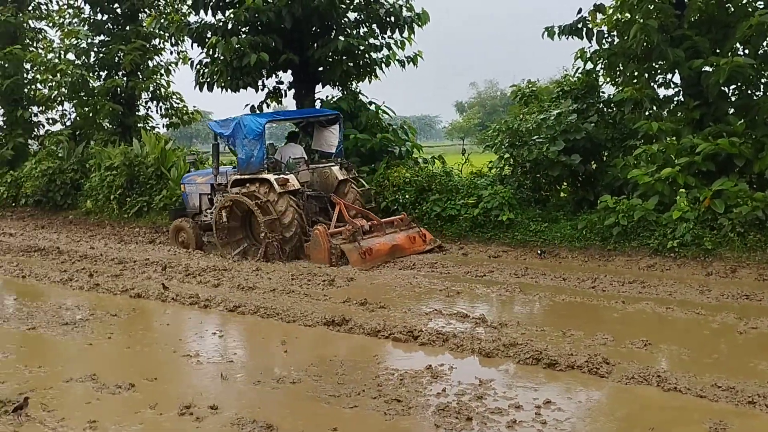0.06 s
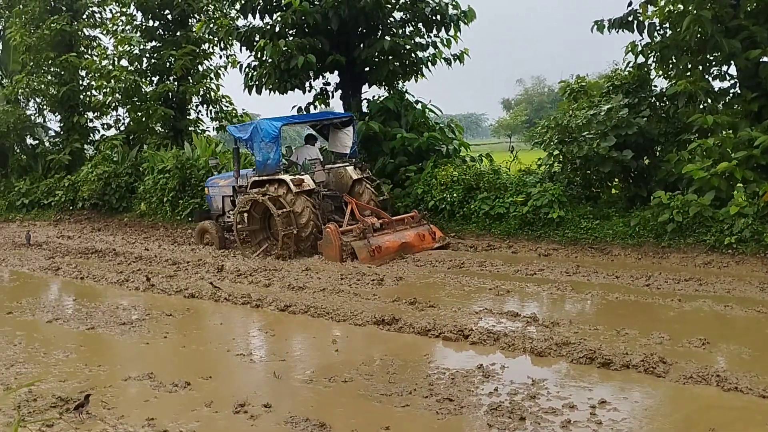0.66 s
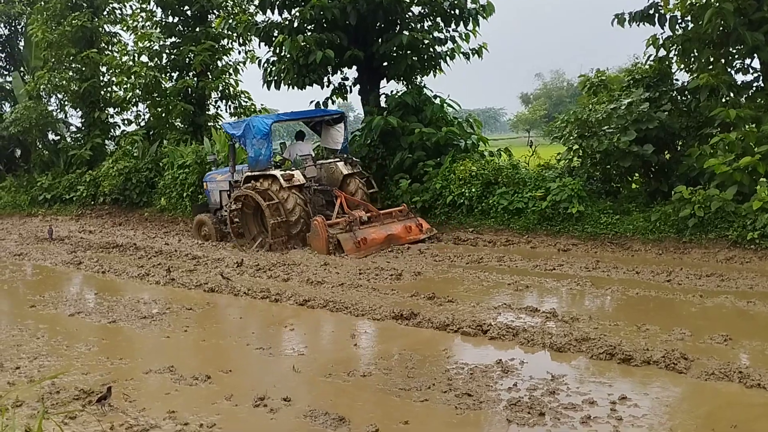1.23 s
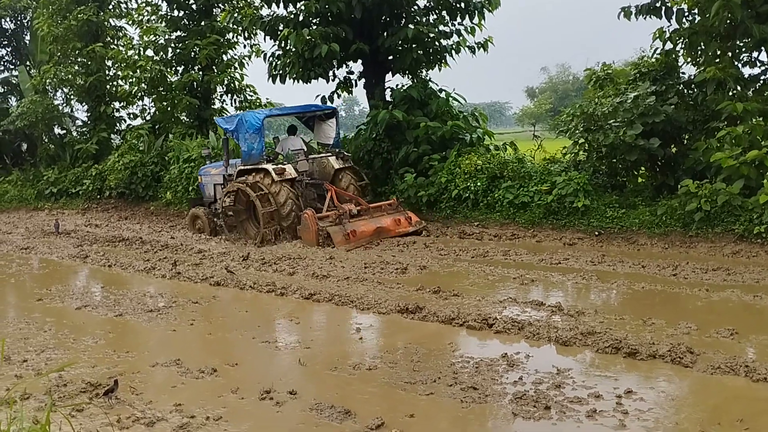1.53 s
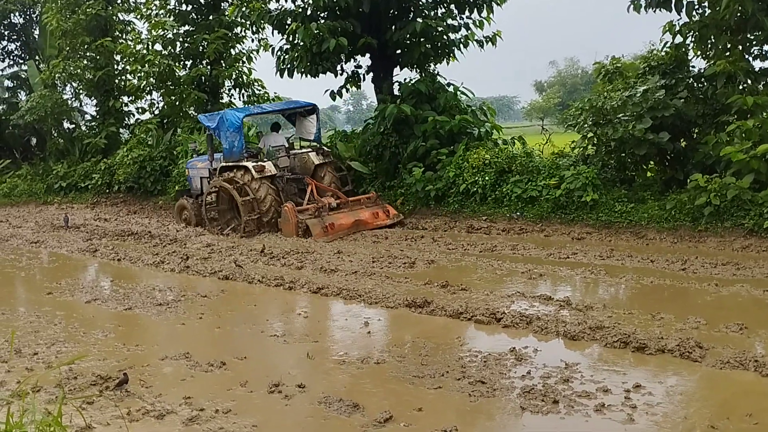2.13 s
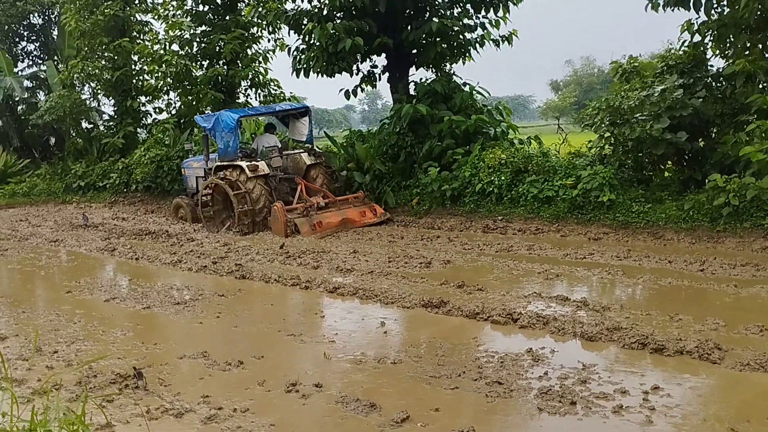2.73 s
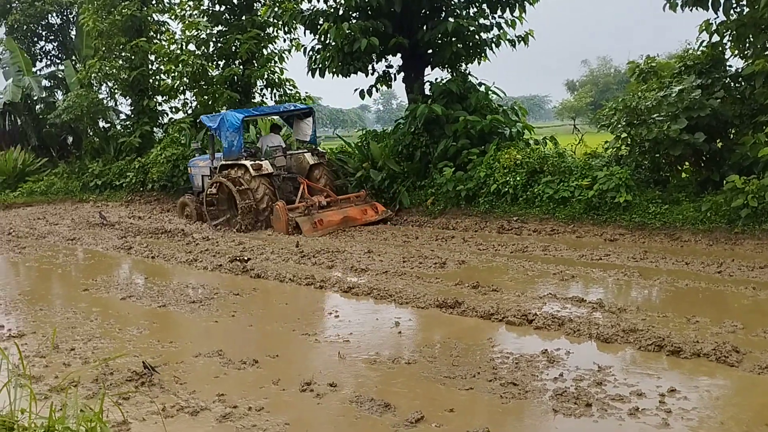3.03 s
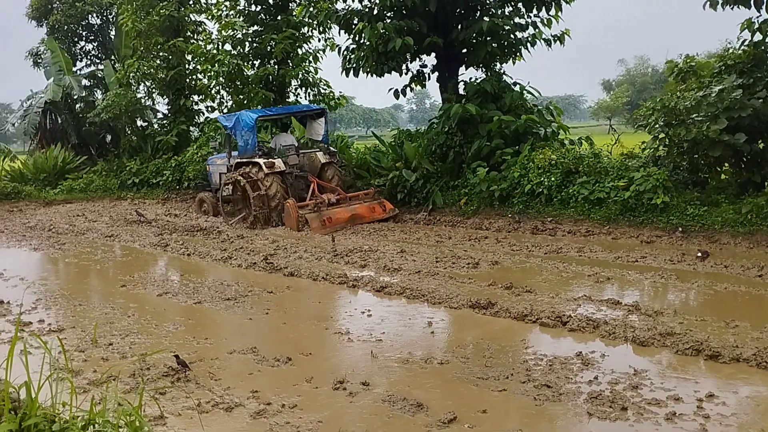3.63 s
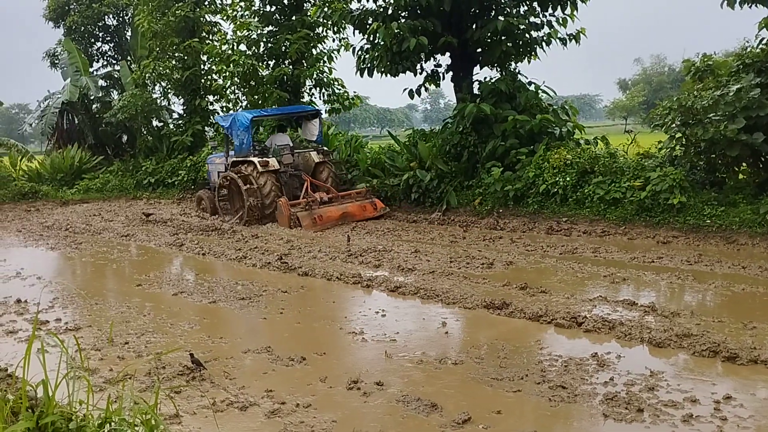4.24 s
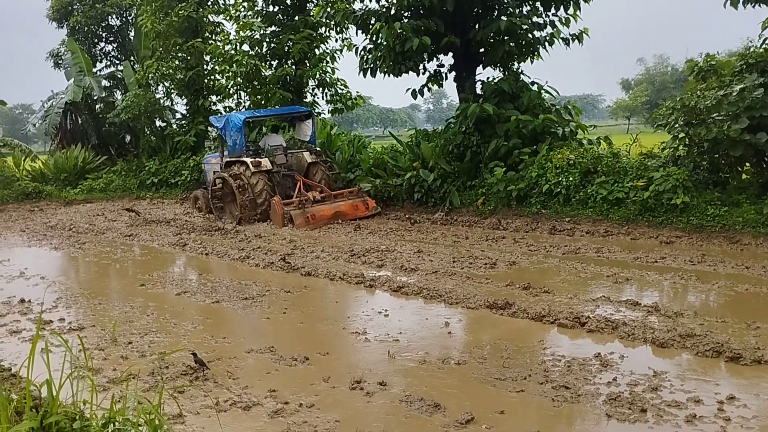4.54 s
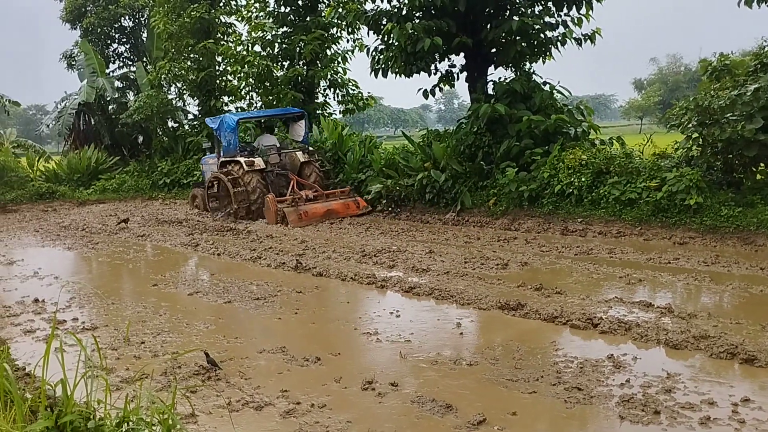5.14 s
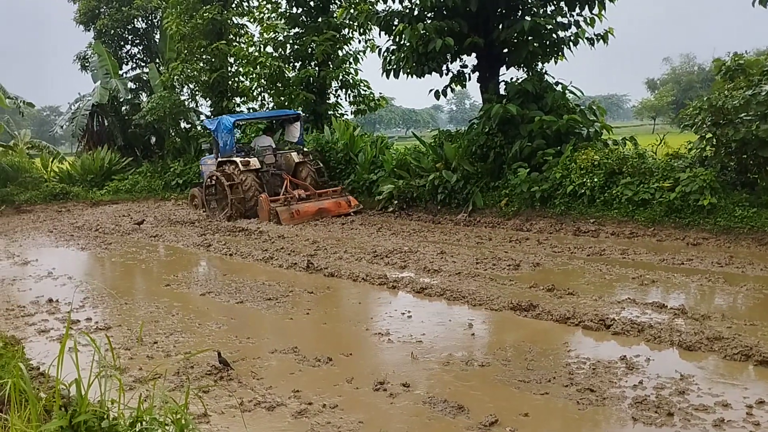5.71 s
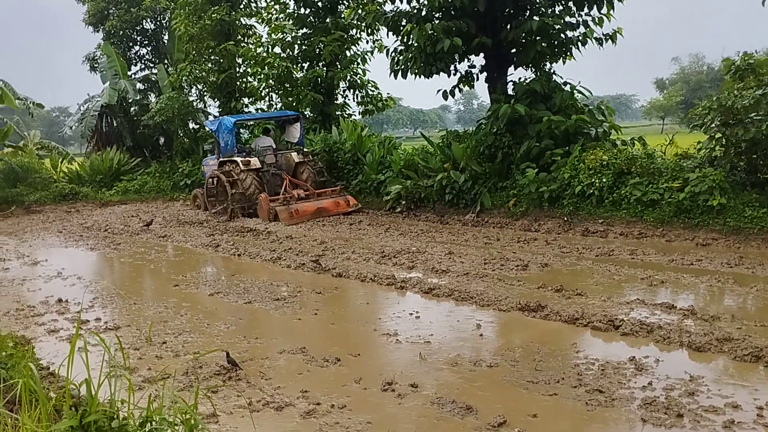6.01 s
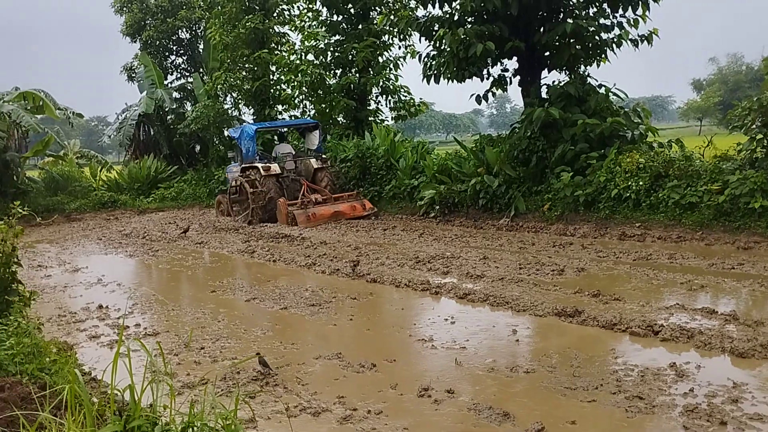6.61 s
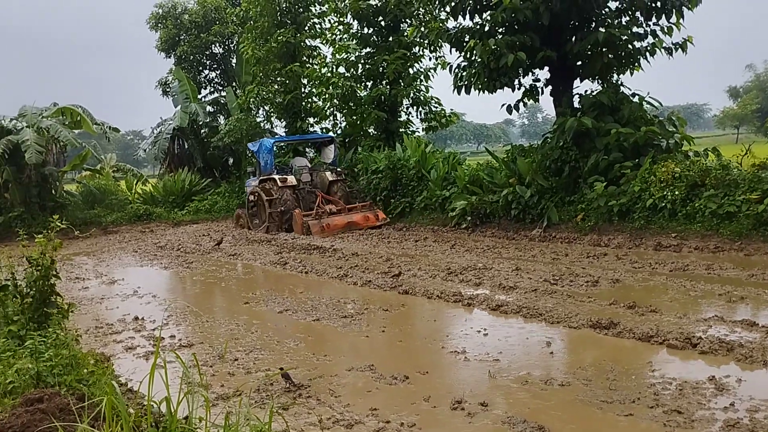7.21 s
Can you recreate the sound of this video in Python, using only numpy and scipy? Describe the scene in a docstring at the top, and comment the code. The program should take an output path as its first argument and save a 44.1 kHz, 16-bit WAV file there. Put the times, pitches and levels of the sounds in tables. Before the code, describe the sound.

A tractor's diesel engine throbs and clatters as it moves slowly away, its tiller churning mud with occasional dull thumps.

```python
"""Tractor tilling a flooded field

A three-cylinder diesel drags a rotary tiller slowly away, labouring as the blades bite. Each firing
sends a pressure wave, a gruff puff and a spit of hiss out of the stack and rattles the engine block.
The tiller drones and rumbles; now and then mud thumps its hood, a stone knocks a blade, a squeal swells."""
import sys
import numpy as np
from scipy import signal
from scipy.fft import rfft, irfft, next_fast_len
from scipy.io import wavfile
from scipy.ndimage import uniform_filter1d

SR = 44100
rng = np.random.default_rng(int(sys.argv[2]) if len(sys.argv) > 2 else 0)


def master_out(mix):
    """Clip the mix to full scale and print it as 16-bit PCM to the path in sys.argv[1]."""
    frames = np.transpose(np.atleast_2d(mix))
    ceiling = np.clip(frames, -1, 1)
    pcm = np.round(ceiling * 32767).astype(np.int16)
    wavfile.write(sys.argv[1], SR, pcm)


N = 320165
FFT_SIZE = next_fast_len(N, True)
T, HZ = np.arange(N) / SR, np.fft.rfftfreq(FFT_SIZE, 1 / SR)


def amp(db):
    """Decibels to linear gain."""
    return 10 ** (np.asarray(db) / 20)


def unit_rms(x):
    """Scales a sound so that its mono mix has rms 1."""
    return x / np.sqrt(np.mean(np.atleast_2d(x).mean(0) ** 2) + 1e-20)


def filtered(x, gain):
    """Multiplies a sound's spectrum by a gain per frequency."""
    return irfft(rfft(x, FFT_SIZE) * gain, FFT_SIZE)[..., :N]


def eq_curve(points):
    """Joins EQ points on a log-frequency axis, one dB curve per level column."""
    hz, *columns = np.transpose(points)
    return np.array([np.interp(np.log(HZ + 1), np.log(hz), db) for db in columns])


def colour(x, eq_db):
    """Applies an EQ curve and normalises to rms 1."""
    return unit_rms(filtered(x, amp(eq_db)))


def wander(rate_hz):
    """Smooth random modulation of rms 1."""
    return unit_rms(filtered(rng.standard_normal(N), np.exp(-(HZ / rate_hz) ** 2)))


def stereo_noise(correlation):
    """White noise, partly shared by both channels."""
    centre = np.sqrt(correlation) * rng.standard_normal(N)
    return centre + np.sqrt(1 - correlation) * rng.standard_normal((2, N))


# Stereo placement of rumble, puffs and hiss: f/Hz, left minus right level/dB
PAN_EQ = [(100, 3.5), (250, 0), (380, -5), (470, -3), (560, 9.5), (700, 3.5), (800, -1.5), (950, -2.5),
          (1060, -38), (8300, 1), (10000, 1), (11000, 10), (12500, 2), (15500, 1)]
def panned_eq(points):
    """Splits an EQ curve into left and right, panning each band."""
    return eq_curve(points) + eq_curve(PAN_EQ) * np.array([[.5], [-.5]])


# Engine speed, sagging whenever the tiller bites: t/s, firing rate/Hz
ENGINE_SPEED = [(0.0, 31.54), (0.83, 31.61), (1.15, 31.24), (1.21, 31.48), (2.37, 31.48), (2.4, 31.26),
                (3.03, 31.16), (3.61, 31.69), (3.85, 31.32), (4.61, 31.62), (4.87, 31.18), (5.53, 31.67),
                (5.87, 31.39), (6.99, 31.92), (7.26, 31.56)]
def firing_rate():
    """Firings per second at each sample."""
    return np.interp(T, *np.transpose(ENGINE_SPEED))


def fader(db, fade_db, load_db, cruise_hz=31.5):
    """Gain from db: down fade_db per doubling of distance, up load_db per Hz of sag below cruise."""
    closest_m, closest_s, pace_m_per_s = 11.15, -2.12, 1.676  # a straight path, already past us
    distance = np.hypot(closest_m, pace_m_per_s * (T - closest_s))
    sag_hz = cruise_hz - firing_rate()
    return amp(db - fade_db * np.log2(distance / distance[0]) + load_db * sag_hz)


def bursts(firings, lag, rise, fall, spread_db, cylinder_db):
    """One swell per firing, sized by cylinder and chance; lag, rise and fall are in firing periods."""
    index = np.floor(firings - lag + .5).astype(int)
    age = firings - lag - index
    chance_db = spread_db * rng.standard_normal(index.max() + 2)[index + 1]
    size_db = chance_db + np.array(cylinder_db)[index % len(cylinder_db)]
    return amp(size_db) * np.exp(-.5 * (age / np.where(age < 0, rise, fall)) ** 2)


# Cues for squeals and panel swells: start/s, end/s, f/Hz, level before panning/dB
RINGING_SWELLS = [(0, .25, 2464, -41), (.15, .78, 4350, -46), (.68, 1.02, 2880, -43), (1.2, 2.4, 1470, -48),
                  (2, 2.55, 3530, -48), (3.5, 3.95, 5300, -59), (6.25, 6.7, 2430, -47)]
def ringing_swells(width_hz=40):
    """Faint ringing notes swell and fade: thin squeals, and the loose panel singing louder."""
    out = np.zeros(N)
    for start, end, hz, db in RINGING_SWELLS:
        swell = np.sin(np.pi * np.clip((T - start) / (end - start), 0, 1))
        note = filtered(rng.standard_normal(N), np.exp(-((HZ - hz) / width_hz) ** 2))
        out += amp(db) * swell * unit_rms(note)
    return out * amp([[-6], [3]])  # panned right


def loose_panel(firings, note_hz=2490, width_hz=110):
    """Each firing shakes a loose panel, which rings on briefly to the right."""
    shake = .88 + bursts(firings, lag=.086, rise=.036, fall=.36, spread_db=6, cylinder_db=[0, 2, -2])
    resonance = 1 / (1 + 2j * (HZ - note_hz) / width_hz)
    skirt_cut = np.exp(-(2 * (HZ - note_hz) / note_hz) ** 2)
    ring = filtered(stereo_noise(correlation=.15) * shake, resonance * skirt_cut)
    return unit_rms(ring * amp([[-14], [0]]))


# Partials of the tiller drive: multiple of its turning rate, level/dB
DRIVE_PARTIALS = [(2, -36.5), (3, -47), (4, -39)]
def tiller_drone(turning_hz=61.23):
    """The tiller drive hums slightly flat of the engine and beats against it."""
    turns = np.cumsum(turning_hz * (1 + .00314 * wander(rate_hz=1.74))) / SR
    return sum(amp(db) * np.sin(2 * np.pi * (k * turns + rng.random())) for k, db in DRIVE_PARTIALS)


# Low bed of churning mud: f/Hz, level/dB
MUD_EQ = [(15, -18), (40, 0), (70, -10), (110, -2.5), (150, -2), (200, -1), (255, 0.5), (310, -2.5),
          (352, -1), (380, -8), (405, -5.5), (455, -18), (600, -23.5), (1200, -81)]
def mud_rumble():
    """Churned mud drums unevenly under the hood."""
    churn = stereo_noise(correlation=.995) * amp(1.3 * wander(rate_hz=25))
    return colour(churn, panned_eq(MUD_EQ))


def impacts(hits, modes, attack_s, detune):
    """Each hit rings the same modes, transposed to put the strongest at the struck spot's pitch."""
    out = np.zeros(N)
    main_hz = max(modes, key=lambda mode: mode[1])[0]
    for start, peak_db, pitch_hz in hits:
        slot = out[round(start * SR):][:SR // 5]
        t = T[:len(slot)]
        ring = np.zeros(len(slot))
        for hz, db, t60 in modes:
            tuned_hz = hz * pitch_hz / main_hz * (1 + detune * rng.standard_normal())
            ring += amp(db - 60 * t / t60) * np.sin(2 * np.pi * (tuned_hz * t + rng.random()))
        ring *= 1 - np.exp(-(t / attack_s) ** 2)
        slot += amp(peak_db) * ring / abs(ring).max()
    return out


# Stone cues: t/s, peak level/dB, pitch/Hz
STONE_HITS = [(.899, -19, 895), (1.19, -26, 705), (2.333, -21, 866), (2.721, -25, 930), (3.095, -26, 690),
              (4.105, -24, 800), (5.298, -26.5, 900), (5.561, -22.5, 915), (5.627, -26, 930),
              (5.964, -25, 880)]
# Modes of a blade: f/Hz, level/dB, t60/s
BLADE_MODES = [(634, -5, 0.015), (754, 5, 0.038), (916, 7.5, 0.029)]
def stone_knocks():
    """Hard stones strike the blades with a quick attack and a short ring."""
    return impacts(STONE_HITS, BLADE_MODES, attack_s=.0018, detune=.0092)


# Clod cues: t/s, peak level before panning/dB, pitch/Hz
CLOD_HITS = [(.123, -18.5, 295), (.356, -27, 340), (.514, -24, 350), (.937, -20, 291), (1.254, -21, 335),
             (1.585, -22, 355), (1.645, -19, 277), (2.308, -19, 324), (2.332, -22, 339), (2.476, -22, 352),
             (2.622, -20, 330), (3.025, -21, 315), (3.091, -18.5, 321), (3.236, -19.5, 350),
             (3.822, -23, 342), (3.88, -23, 357), (4.309, -21, 353), (5.605, -23.5, 286)]
# Modes of the tiller's hood: f/Hz, level/dB, t60/s
HOOD_MODES = [(223, -2, 0.13), (273, -11, 0.1), (312.5, -2.5, 0.12), (344, 7, 0.13)]
def clod_thumps():
    """Big soft clods hit the hood with a rounded attack, just right of centre."""
    return impacts(CLOD_HITS, HOOD_MODES, attack_s=.005, detune=.012) * amp([[-1], [1]])


# Broad tone of the clatter: f/Hz, left level/dB, right level/dB
CLATTER_EQ = [(300, -42, -51), (492, -14, 4.5), (800, -9, -12), (1070, -6.5, -9), (1286, -6, -1),
              (2400, -5, -6.5), (4750, -11.5, -4.5), (5920, -12.5, -7.5), (7530, -17.5, -11),
              (8300, -42, -35), (10000, -28, -31), (15000, -52, -50)]
# Resonances of block and panels: f/Hz, width/Hz, left boost/dB, right boost/dB
BLOCK_RESONANCES = [(1159, 51, 8.5, 1), (1344, 300, 11, 0.5), (1457, 157, -5.5, 9), (1682, 145, 5.5, 5.5),
                    (1837, 80, 7.5, 4), (2143, 416, 1, 9.5), (2446, 270, 3.5, 12), (2680, 140, -3, 2.5),
                    (2870, 277, -8, 10), (3154, 110, 6.5, 6.5), (3314, 140, 10, 0), (3594, 345, -5.5, 10),
                    (4285, 640, 3, 5.5), (4930, 200, -1, 6)]
def block_clatter(firings):
    """Combustion knock and the ticking of valves and gears ring the block and its panels."""
    knock = bursts(firings, lag=.16, rise=.13, fall=.051, spread_db=6.5, cylinder_db=[0, 2, -2])
    ticks = amp(.68 * wander(rate_hz=52))
    rattle = stereo_noise(correlation=.23) * (1 + .19 * knock) * ticks
    rattle[1] = np.roll(rattle[1], 9)  # reaches the right side 9 samples later
    boost_db = sum(np.array([[left], [right]]) / (1 + (2 * (HZ - hz) / width) ** 2)
                   for hz, width, left, right in BLOCK_RESONANCES)
    return colour(rattle, eq_curve(CLATTER_EQ) + boost_db)


# Airy top of the exhaust: f/Hz, level/dB
HISS_EQ = [(5000, -35), (8300, -8.5), (9000, -2.5), (9800, -1.5), (11000, -9.5), (11700, -3.5), (12500, 1),
           (15500, 1)]
# Tilt that makes the spits brighter than the leak: f/Hz, level/dB
SPIT_EQ = [(8000, -5), (11000, -3.5), (12500, 0), (15500, 0)]
# Accents, harder spits from the stack: t/s, boost/dB
SPIT_ACCENTS = [(.936, 4), (1.193, 3), (1.289, 2)]
def stack_hiss(firings):
    """A sharp spit of gas at each firing, over a steady leak; distance smooths the spits away."""
    gate = bursts(firings, lag=-.01, rise=.06, fall=.155, spread_db=1.7, cylinder_db=[0, .6, -.6])
    gate *= fader(db=5, fade_db=7, load_db=2)  # height over the leak
    accent_db = sum(db * np.exp(-((T - at) / .015) ** 2) for at, db in SPIT_ACCENTS)
    spits = filtered(stereo_noise(correlation=.033) * gate * amp(accent_db), amp(eq_curve(SPIT_EQ)))
    leak = stereo_noise(correlation=.034) * amp(.5 * wander(rate_hz=19))
    mean_power = 1 + uniform_filter1d(gate ** 2, size=SR // 2)
    return colour((leak + spits) / np.sqrt(mean_power), panned_eq(HISS_EQ))


# Gruff midrange of the silencer: f/Hz, level/dB
PUFF_EQ = [(200, -58), (400, -10), (470, -7.5), (560, -2.5), (700, 3.5), (830, 5), (960, 4), (1060, -13.5),
           (1200, -49.5), (2000, -42)]
def stack_puffs(firings):
    """Turbulent gas leaves the silencer, surging a little with each pressure wave."""
    surge = bursts(firings, lag=.052, rise=.093, fall=.045, spread_db=7, cylinder_db=[0, 1, -1])
    gas = stereo_noise(correlation=.99) * (2 + .27 * surge) * amp(.68 * wander(rate_hz=23))
    return colour(gas, panned_eq(PUFF_EQ))


# Body of the exhaust note: multiple of the firing rate, level/dB
FIRING_HARMONICS = [(1, -4), (2, 0), (3, -7), (4, -9), (5, -12.2), (6, -19), (7, -21), (8, -24), (9, -22.5),
                    (10, -27), (11, -26)]
# Lope of unequal cylinders: multiple of the three-firing cycle rate, level/dB
LOPE_HARMONICS = [(4, -32), (5, -32), (7, -34), (8, -33), (10, -24.5), (13, -31)]
def exhaust_wave(firings, low_cut_hz=32):
    """Pressure builds and drops at each firing; a low cut thins the deepest bass and shapes the chug."""
    jittered = firings + .003 * wander(rate_hz=22)
    cycles = jittered / 3
    pulses = -sum(amp(db) * np.sin(2 * np.pi * k * jittered) for k, db in FIRING_HARMONICS)
    lope = sum(amp(db) * np.sin(2 * np.pi * (k * cycles + rng.random())) for k, db in LOPE_HARMONICS)
    pressure = (pulses + lope) * amp(.05 * wander(rate_hz=10))
    low_cut = signal.butter(2, low_cut_hz, "high", fs=SR)
    return unit_rms(signal.lfilter(*low_cut, pressure))


def scene(first_firing_s=.0189):
    """Engine layers share one firing clock, swell under load and fade with distance, treble fastest."""
    firings = np.cumsum(firing_rate()) / SR - first_firing_s * ENGINE_SPEED[0][1]
    exhaust_gain = fader(db=-17.7, fade_db=5.7, load_db=1.6)
    exhaust = exhaust_gain * exhaust_wave(firings)
    puffs = fader(db=-34.5, fade_db=7, load_db=1.5) * stack_puffs(firings)
    hiss = fader(db=-44, fade_db=9.5, load_db=3.5) * stack_hiss(firings)
    clatter = fader(db=-33, fade_db=8.5, load_db=.4) * block_clatter(firings)
    panel = fader(db=-43.5, fade_db=13, load_db=3) * loose_panel(firings)
    ringing = ringing_swells()
    mud = fader(db=-30, fade_db=3.5, load_db=1.5) * mud_rumble()
    hits = clod_thumps() + stone_knocks()
    drone = tiller_drone() * exhaust_gain / exhaust_gain.mean()  # rides the exhaust's fader
    return ringing + panel + drone + mud + hits + clatter + hiss + puffs + exhaust


def record(dry, cutoff_hz=15870):
    """A steep high cut on the whole mix."""
    high_cut = signal.firwin(1023, cutoff_hz, window=("kaiser", 9), fs=SR)
    return signal.oaconvolve(dry, high_cut[None], "same")


dry = scene()
out = record(dry)
master_out(out)
```